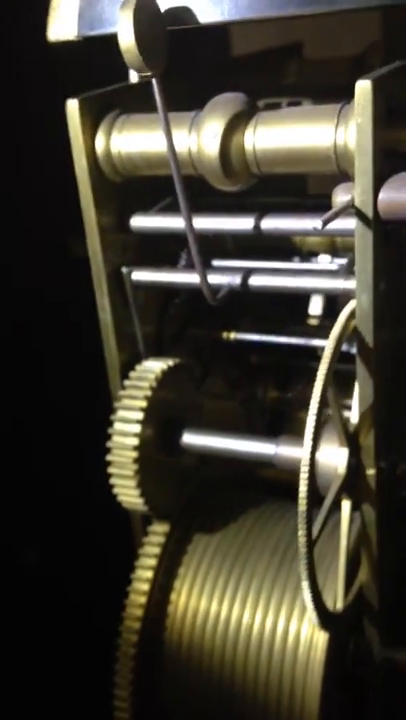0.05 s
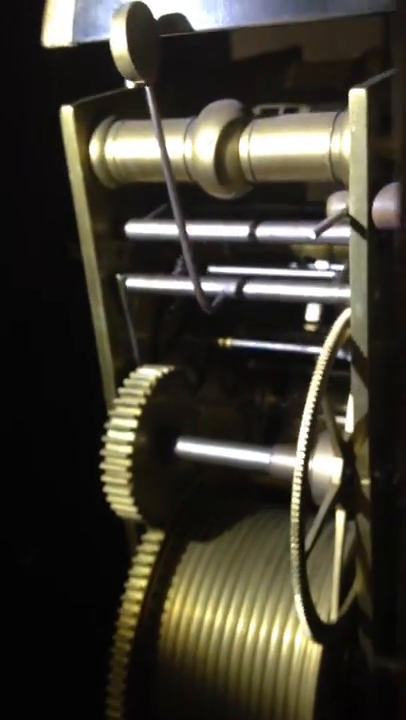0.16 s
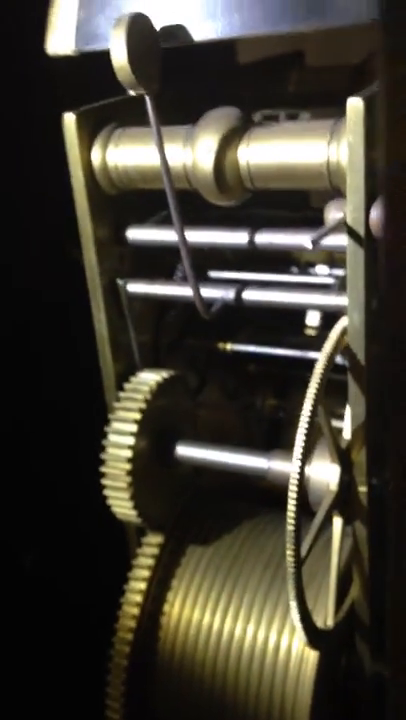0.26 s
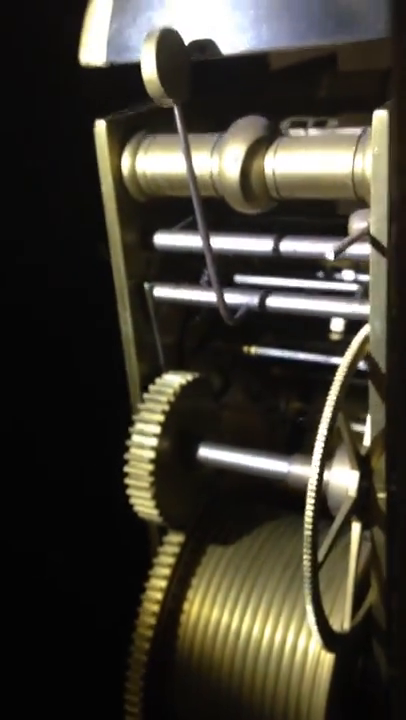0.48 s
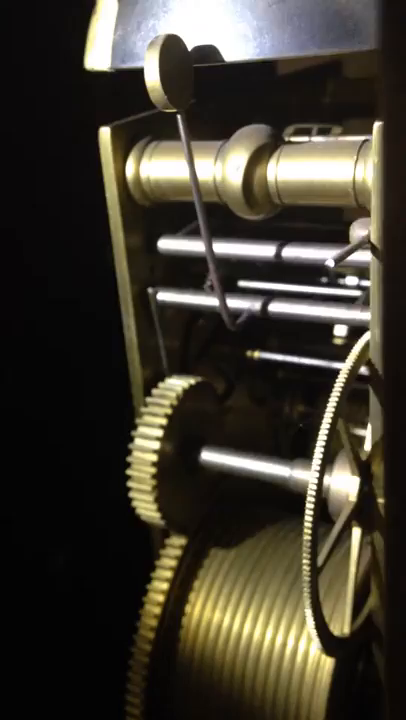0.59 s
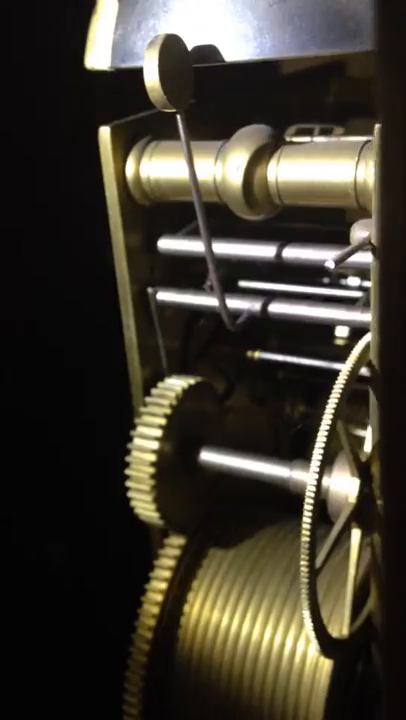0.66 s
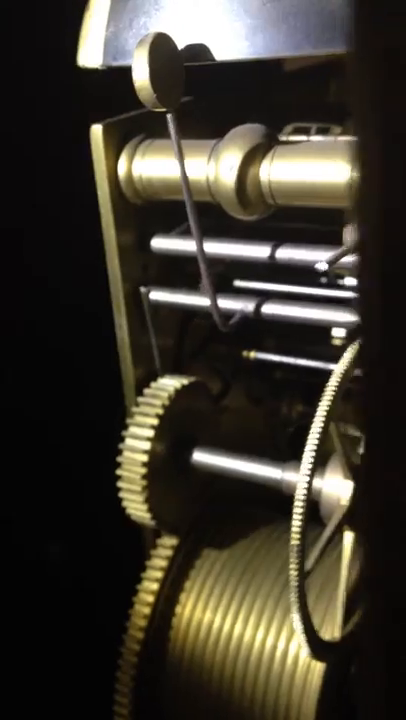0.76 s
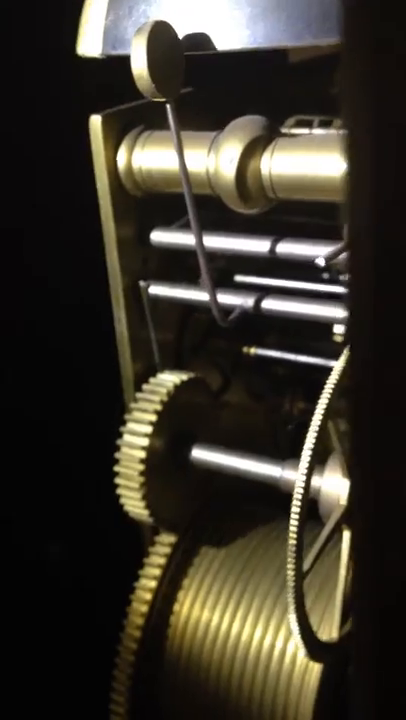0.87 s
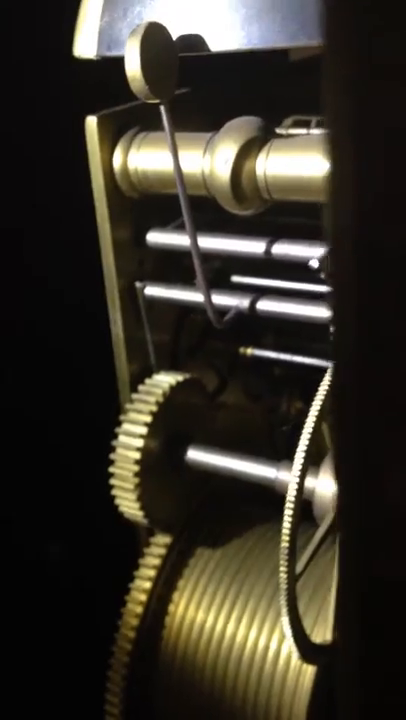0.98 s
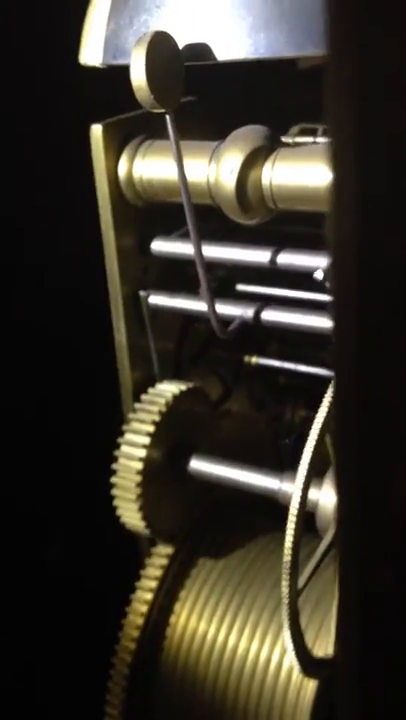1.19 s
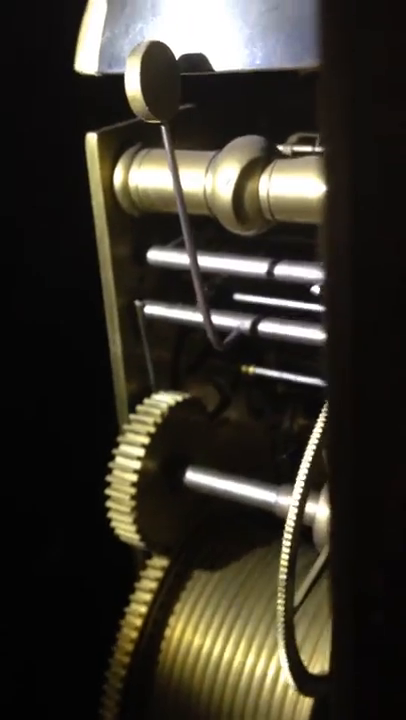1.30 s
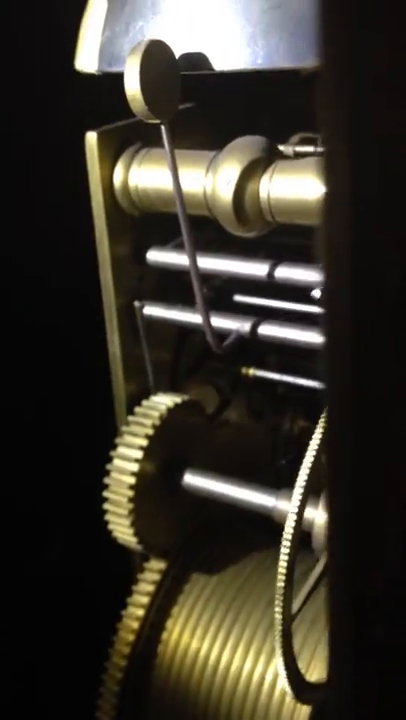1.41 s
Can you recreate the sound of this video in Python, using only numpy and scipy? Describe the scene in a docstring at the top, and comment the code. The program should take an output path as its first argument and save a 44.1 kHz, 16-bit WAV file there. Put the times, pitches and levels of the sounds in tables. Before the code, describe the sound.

A longcase clock gives one low clunk at about 0.2 seconds, close to the microphone. A metal part scrapes briefly and judders into place, ringing the brass while the wooden case booms and rocks to rest by about 0.8 seconds. Loose metal ticks faintly near 0.8 and 1.3 seconds, with a soft handling rub around 1.4 seconds. Quiet room rumble and hiss lie underneath throughout.

```python
"""A longcase clock gives one low clunk, heard with the microphone close to the movement.
A part scrapes briefly and judders home: the brass rings, the wooden case booms and rocks to rest.
Loose metal ticks faintly and a soft rub of handling follows.
Quiet room rumble and microphone hiss lie under it all."""
import sys
import numpy as np
from scipy import signal
from scipy.fft import rfft, irfft
from scipy.io import wavfile

SR = 44100
rng = np.random.default_rng(int(sys.argv[2]) if len(sys.argv) > 2 else 0)


def generate_wav(sig):
    """Save sig (samples, or channels by samples) to the path in sys.argv[1] as 16-bit PCM at SR."""
    pcm = np.round(np.clip(np.atleast_2d(sig).T, -1, 1) * 32767).astype(np.int16)
    wavfile.write(sys.argv[1], SR, pcm)


N = 63945
T = np.arange(N) / SR


def undb(db):
    """Decibels to gain."""
    return 10 ** (np.asarray(db) / 20)


def unit(x):
    """Scale to rms 1."""
    return x / np.sqrt(np.mean(x ** 2))


def fade(t60_s):
    """Exponential decay from time zero, down 60 dB at t60_s."""
    return np.exp(-np.log(1000) * T / t60_s)


def through(x, response):
    """Play x through an impulse response."""
    return signal.fftconvolve(x, response)[:N]


def colour(x, points):
    """Minimum-phase filter that follows (frequency_hz, gain_db) points."""
    hz, db = np.array(points, float).T
    bins_hz = np.maximum(np.fft.rfftfreq(2 * N, 1 / SR), 1)
    gain = undb(np.interp(np.log(bins_hz), np.log(hz), db))
    cepstrum = irfft(np.log(gain))
    cepstrum[1:N] *= 2  # folded onto positive time, so nothing rings ahead of a hit
    cepstrum[N + 1:] = 0
    return through(x, irfft(np.exp(rfft(cepstrum)))[:N])


def band(hz, width_hz):
    """Noise in one steep-sided resonance, rms 1."""
    b, a = signal.iirpeak(hz, hz / width_hz, fs=SR)
    return unit(signal.lfilter(b, a, signal.lfilter(b, a, rng.standard_normal(N))))


def ring(modes):
    """Impulse response of a set of damped modes."""
    return sum(undb(db) * fade(t60) * np.sin(2 * np.pi * hz * T) for hz, db, t60 in modes)


def blows(rows):
    """One impulse for each (start_s, level_db) row."""
    impulses = np.zeros(N)
    for start_s, db in rows:
        impulses[int(start_s * SR)] += undb(db)
    return impulses


def lingering(force, t60_s):
    """Envelope of the diffuse ring that a force builds up and leaves behind."""
    decay = fade(t60_s) ** 2
    return np.sqrt(np.abs(through(force ** 2, decay / decay.sum())))


def room_tone():
    """Low room rumble wavers a little under even microphone hiss."""
    # spectrum of rumble and hiss: frequency_hz, gain_db
    spectrum = [(15, -84), (25, -20), (46, -6), (95, -1), (121, -6), (186, -10), (213, -7.5), (438, -11),
                (488, -12), (604, -12.5), (769, -15), (1390, -18), (1540, -19), (2130, -18), (15000, -21.5)]
    waver_db, waver_per_s = 0.5, 19.7
    noise = unit(colour(rng.standard_normal(N), spectrum))
    rumble = signal.sosfiltfilt(signal.butter(2, 230, fs=SR, output="sos"), noise)
    waver = np.interp(T * waver_per_s, np.arange(N), rng.standard_normal(N))
    return undb(-66.5) * (noise + rumble * (undb(waver_db * waver) - 1))


def metal_ticks():
    """Loose metal parts settle, each with a faint, brief ring."""
    # ticks of small parts: start_s, pitch_hz, width_hz, level_db, t60_s
    ticks = [(0.117, 3700, 1240, -70, 0.087), (0.181, 3180, 1120, -58.5, 0.11),
             (0.196, 3580, 1200, -57, 0.3), (.792, 2350, 152, -69, 0.054),
             (1.284, 3900, 1190, -64.5, 0.019), (1.409, 2370, 201, -76, 0.14)]
    return sum(band(hz, width_hz) * through(blows([(start_s, db)]), fade(t60_s))
               for start_s, hz, width_hz, db, t60_s in ticks)


def wood_rubs():
    """Short swells of friction make the woodwork groan, with a little grit."""
    # bell-shaped swells of rubbing: peak_s, spread_s, level_db
    rubs = [(0.134, 0.011, -70), (0.201, 0.01, -47), (0.274, 0.034, -47.5), (0.47, 0.0051, -65.5),
            (0.636, 0.0085, -67.5), (0.698, 0.004, -78), (0.85, 0.012, -68.5), (1.294, 0.02, -69.5),
            (1.36, 0.14, -74)]
    effort = sum(undb(db) * np.exp(-.5 * ((T - peak_s) / spread_s) ** 2) for peak_s, spread_s, db in rubs)
    groan = band(hz=332.3, width_hz=84.5)
    grit = undb(-10) * band(hz=1130, width_hz=1570)
    return effort * (groan + grit)


def brass_movement():
    """Tiny slips and a few harder contacts ring the brass and scatter inside the clock's hood."""
    # sharp contacts in the movement: start_s, relative_level_db
    contacts = [(.1948, -18), (.2207, -12), (.2342, -4), (.2392, -4.5), (.2535, -6), (.303, -12.5)]
    # tone of the clatter: frequency_hz, gain_db
    clatter_tone = [(150, 7), (300, -1), (600, 1.5), (850, -6), (980, -6.5), (1350, -1), (1900, 4.5),
                    (2400, 4), (2850, -7.5), (3400, -0.5), (4100, -5), (5100, -10.5), (6100, -7),
                    (9000, -22), (11000, -19), (15000, -34)]
    # modes of the brass: pitch_hz, relative_level_db, t60_s
    brass_modes = [(860, -5.5, 0.31), (924, -8, 0.17), (1000, -15, 0.38), (1386, 0.5, .24),
                   (1639, -7.5, 0.22), (1730, -13, 0.16), (1848, 0, 0.24), (2192, 0.5, 0.13),
                   (2242, -5.5, 0.12), (2285, -9, 0.15), (2367, -20, 0.09), (2480, -5, 0.22),
                   (3134, -2.5, 0.096), (3980, -20, 0.34), (4165, -10, 0.09)]
    scrape_start_s, scrape_peak_s, rise_db_per_s, fall_db_per_s = .183, 0.2462, 250, 376
    slips_per_s, crack_decay_s = 1500, .003
    past_peak_s = T - scrape_peak_s
    pressure_db = np.minimum(rise_db_per_s * past_peak_s, -fall_db_per_s * past_peak_s)
    pressure = undb(pressure_db) * (T > scrape_start_s)  # the scrape swells and lets go
    direction = np.sign(rng.standard_normal(N))
    slips = unit(direction * (rng.random(N) < slips_per_s / SR))
    crack = rng.standard_normal(N) * np.exp(-T / crack_decay_s)
    clicks = through(blows(contacts), crack / np.linalg.norm(crack))
    force = undb(-41) * pressure * slips + undb(-14) * clicks
    hood_scatter = undb(-2) * lingering(force, t60_s=0.35) * rng.standard_normal(N)
    dull_tail = undb(-11) * lingering(force, t60_s=0.46) * band(hz=620, width_hz=1020)
    clatter = colour(force + hood_scatter + dull_tail, clatter_tone)
    return clatter + undb(-37) * through(force, ring(brass_modes))


def wooden_case():
    """Soft knocks drive the wooden panels; the trunk booms on."""
    # knocks on the case: start_s, relative_level_db
    knocks = [(.184, -16), (.2135, -9.5), (.2345, 3.5), (.2552, 0), (.2758, -12.5), (.3045, -6.5),
              (.3465, -10.5), (.396, -13), (.428, -24), (.461, -53), (.492, -21.5), (.616, -22.5),
              (.706, -28.5), (.745, -31), (1.384, -34)]
    # modes of the case: pitch_hz, relative_level_db, t60_s
    case_modes = [(45.8, -19.5, 0.24), (76.7, -4, 0.21), (98.1, -1, 0.15), (158.5, -8.5, 0.3),
                  (225, -11, 0.082), (310, -20.5, 0.23), (346.7, -15.5, 0.35), (426, -15, .25)]
    contact_s = 0.0032
    push = T / contact_s * np.exp(-4 * T / contact_s)
    force = through(blows(knocks), push / push.sum())
    panels = through(force, ring(case_modes))
    boom = unit(lingering(force, t60_s=0.78) * band(hz=88, width_hz=82))
    return undb(-30) * panels + undb(-59) * boom


def scene():
    """Clock and room at one close microphone."""
    return (wooden_case() + brass_movement() + wood_rubs() + metal_ticks() + room_tone())[None]


def record(dry):
    """The recorder drops the deepest bass and cuts the top."""
    low_cut_hz, top_cut_hz = 20, 15300
    low_cut = signal.butter(2, low_cut_hz, "high", fs=SR, output="sos")
    top_cut = signal.ellip(12, .1, 70, top_cut_hz, fs=SR, output="sos")
    return signal.sosfilt(top_cut, signal.sosfilt(low_cut, dry))


dry = scene()
out = record(dry)
generate_wav(out)
```